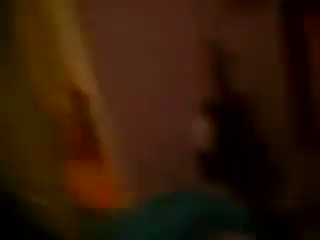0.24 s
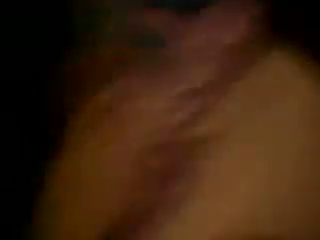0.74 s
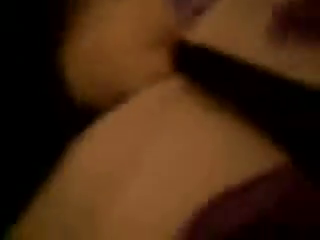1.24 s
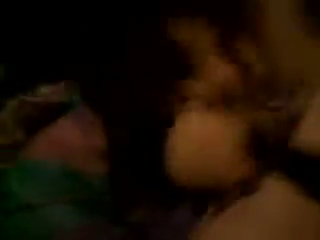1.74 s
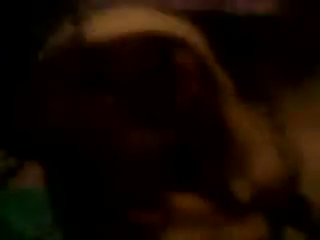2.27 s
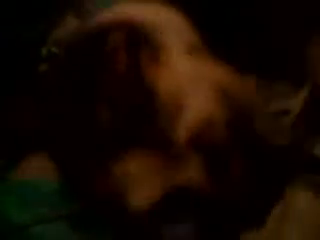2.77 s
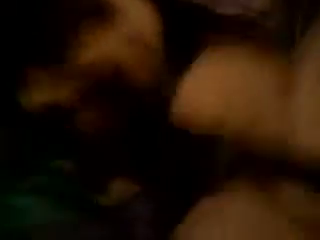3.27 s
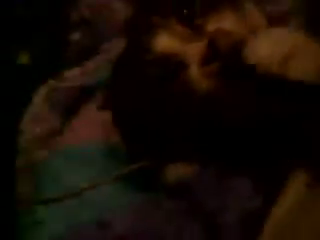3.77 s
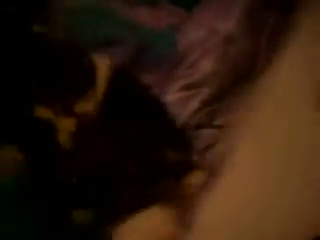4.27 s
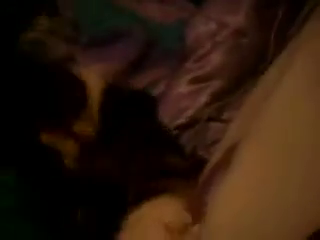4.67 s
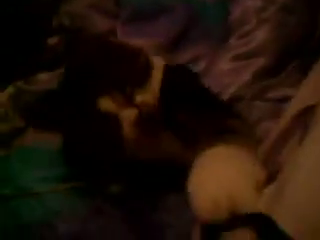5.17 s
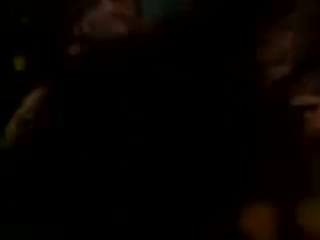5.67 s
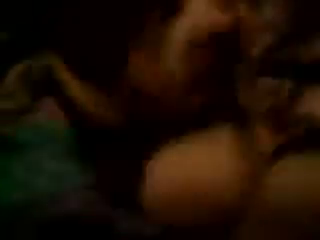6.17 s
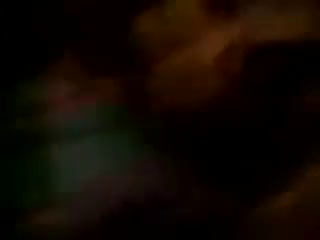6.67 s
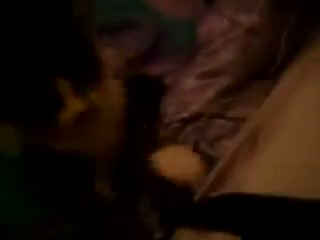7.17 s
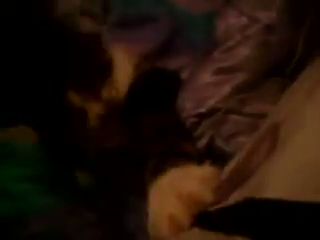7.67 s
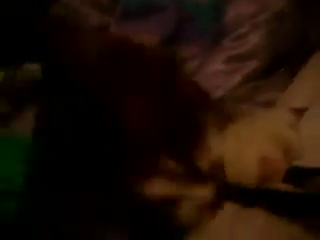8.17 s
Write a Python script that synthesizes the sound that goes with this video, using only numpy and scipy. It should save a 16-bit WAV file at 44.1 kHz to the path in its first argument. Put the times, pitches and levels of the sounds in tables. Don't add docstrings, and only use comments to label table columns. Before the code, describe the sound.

In a quiet indoor space, a cat paws at a hand on bedding right against a small hand-held camera. Quilt folds rustle under a fluttering electrical buzz. Brittle claw clicks, short scrapes and blunt thuds come in uneven bursts, thin out midway, then return as a busy scuffle before the last few strikes. The sound is telephone-like, with low handling rumble and distorted peaks.

```python
import sys
import numpy as np
from scipy import signal
from scipy.fft import rfft, irfft
from scipy.io import wavfile
from scipy.ndimage import uniform_filter1d

SR = 44100
rng = np.random.default_rng(int(sys.argv[2]) if len(sys.argv) > 2 else 0)


def transcribe(signal):
    frames = np.atleast_2d(signal).T
    limited = np.clip(frames, -1, 1)
    pcm = np.round(limited * 32767).astype(np.int16)
    wavfile.write(sys.argv[1], SR, pcm)


def ratio(d):
    e = np.asarray(d, float) / 20
    return 10 ** e


N = 371322

# peak t/s, peak level/dB, ring f/Hz, second ring f/Hz, knock relative level/dB
BLOWS = [(0.989, -1, 2275, 3210.0, -6), (1.8578, -11.5, 2030.0, 3190.0, -10.0),
         (1.917, -13.5, 2790, 3630.0, -8), (2.4177, -4.5, 3596, 2100, -0.5),
         (2.7241, -19, 3170.0, 2590.0, 7.5), (3.4529, -1, 3505, 2260, -1),
         (3.8827, -5.0, 3590.0, 2070.0, -3.0), (3.8894, -3.5, 1880, 3250.0, 0.5),
         (3.8959, -15, 3410.0, 2760.0, -2.0), (5.8604, -18.0, 1910.0, 3170.0, 3.0),
         (5.871, -14, 1870.0, 2470.0, -3), (5.9015, -11, 2400, 2940.0, -17.0),
         (6.102, -13, 2900.0, 3560.0, 7), (6.1311, -13.5, 2120.0, 3140.0, -6.0),
         (6.1422, -1.5, 3570, 1810.0, -4.5), (6.2182, -13, 3120.0, 1820.0, -14),
         (6.2313, -12.5, 3490.0, 2410.0, -4.5), (6.3406, -11, 3120, 3790.0, -14.0),
         (6.3732, -22.5, 2190.0, 3230.0, 5.0), (6.4879, -24, 2150.0, 3180.0, 8.0),
         (6.5689, -11.0, 1840, 3270.0, -2), (6.663, 0.5, 3470, 1680.0, -2), (6.6878, -1, 2067, 3100, 1),
         (6.986, -16, 3105, 1940.0, -10.0), (7.4032, -10.5, 3277, 2730.0, -4.0),
         (7.4089, -14.5, 2777, 1850.0, -9.0), (7.808, -21, 2820.0, 3460.0, 6),
         (7.8162, -3.5, 1960, 3400, -0.5), (7.8335, -5.5, 3340.0, 2050.0, -8),
         (8.2292, -7, 2839, 2100.0, -2)]
# peak t/s, peak level/dB, ring f/Hz, second ring f/Hz,
# second ring relative level/dB
PLUCKS = [(1.0334, -10.5, 2130, 3180, -11), (1.0435, -9.5, 2740, 3610, 1.5), (1.0615, -16, 2130, 3180, 3),
          (1.2344, -17.5, 2990, 3810, -8), (1.5287, -17, 3000, 2000, -18), (1.5531, -18, 1850, 3045, 0.5),
          (1.754, -16.5, 3190, 2380, -12), (1.8601, -14, 3150, 2530, -3.5), (2.7066, -13, 3670, 3010, -2),
          (2.9946, -19.5, 3620, 3040, -5.5), (3.3602, -22, 2200, 3500, -4),
          (3.9076, -22, 2350, 3600, -12.5), (4.3764, -22, 2840, 2300, -2), (6.1708, -15.5, 3180, 2210, -6),
          (6.2018, -10, 3130, 2030, -10), (6.2117, -7.0, 3150, 2610, -14), (6.2274, -15.5, 3110, 2520, -7),
          (6.238, -14, 3210, 2420, -2), (6.2692, -10, 3200, 2210, -8.5), (6.361, -17.5, 3020, 1910, -16),
          (6.4186, -22, 3050, 3770, -6), (6.4517, -22, 3050, 2020, -8.5), (6.5129, -15, 3120, 3750, -5.5),
          (6.6965, -4.0, 3052, 2380, -11), (6.991, -7, 2220, 3530, 0), (7.0902, -5, 3470, 2270, -5.5),
          (7.1003, -8.5, 2360, 3730, -5), (7.1056, -22.5, 2300, 3850, -12), (7.9597, -22, 2870, 3650, -1.5),
          (7.9779, -14.5, 3350, 2020, -7.5)]
# peak t/s, peak level/dB, ring f/Hz
GRAZES = [(0.338, -22, 2190), (0.7893, -22.5, 2720), (0.828, -20.5, 2180), (1.0485, -18.5, 3340),
          (1.3793, -21.5, 2140), (1.7714, -14, 2450), (1.871, -19, 2480), (2.0496, -23, 2554),
          (2.329, -23.5, 3340), (2.4225, -22, 2870), (2.7104, -28.5, 3200), (2.937, -16, 3275),
          (3.465, -19.5, 2460), (3.5916, -15.5, 2510), (3.7698, -21, 3220), (4.826, -20.5, 2150),
          (5.7509, -23.5, 2100), (5.8916, -20, 2010), (6.0634, -19.5, 3060), (6.099, -20, 2950),
          (6.5853, -24, 3490), (6.701, -21, 2300), (7.393, -19, 2210), (7.843, -21.5, 3000),
          (7.845, -20, 3050), (7.935, -30, 2170), (8.3487, -24, 3800), (4.104, -29.5, 2390)]
# peak t/s, peak level/dB, ring f/Hz
SLIPS = [(.859, -36, 2730), (.9025, -30, 2300), (0.9915, -6.5, 3600), (1.0244, -29, 3200),
         (1.0735, -27, 3210), (1.0805, -22, 3430), (1.1005, -26, 3180), (1.1092, -29, 3320),
         (1.115, -27.5, 3400), (1.8568, -14.5, 3220), (1.9736, -27.5, 2300), (2.008, -26, 2550),
         (2.074, -28, 3300), (2.4212, -16, 3570), (2.735, -33, 2790), (2.8546, -18, 2650),
         (3.972, -33.5, 2250), (.9925, -18, 2300), (6.6648, -4.5, 3030), (6.698, -6, 2900),
         (6.6948, -15, 3200), (6.6912, -13, 2900), (6.7, -15, 3000), (7.8355, -10, 3350),
         (6.7275, -30, 2400), (5.288, -33, 2800), (6.295, -28, 2500), (2.9417, -22, 2300),
         (2.979, -27, 2800), (3.038, -30, 3170), (3.886, -15, 2800), (3.8875, -6.5, 3570),
         (5.55, -35, 3310), (5.561, -37, 3300), (5.598, -36, 3200), (5.786, -33, 2320),
         (5.869, -17.5, 2290), (5.894, -29.5, 3200), (6.11, -26, 2940), (6.18, -30, 3120),
         (6.195, -22, 3190), (6.2625, -23, 3250), (6.288, -25, 3200), (6.312, -25.5, 3440),
         (6.4833, -24, 3300), (6.527, -35, 3000), (6.5415, -35, 3300), (6.989, -17, 3000),
         (7.0955, -24, 3300), (7.108, -27, 2300), (7.829, -20, 3000), (7.8527, -25, 2900),
         (7.861, -23, 3200), (7.885, -31, 3300), (7.8935, -35, 2950), (7.9055, -26.5, 3200),
         (8.249, -26, 3000), (8.291, -37, 3300)]
# peak t/s, peak level/dB, ring f/Hz
SNAGS = [(.205, -28, 2170), (0.9272, -29, 2430), (0.9377, -29, 2580), (1.093, -23, 2870),
         (1.188, -25, 3390), (1.2564, -27, 3120), (1.3596, -29.5, 2800), (1.517, -28, 2930),
         (1.954, -23.5, 2900), (2.454, -23.5, 2200), (2.539, -27.5, 3380), (2.987, -23.5, 3400),
         (3.0285, -26.5, 3150), (3.487, -25, 3410), (3.7754, -25, 3160), (4.3858, -24.5, 2290),
         (5.302, -28.5, 2750), (6.4409, -31.5, 2980), (6.5156, -31, 3060), (6.9063, -29, 2270),
         (6.921, -23, 2750), (6.946, -30, 2240), (7.4138, -24, 2850), (7.419, -22.5, 2790),
         (7.4493, -25, 3340), (7.915, -25, 2200), (7.9204, -28, 2500), (8.025, -26.5, 3180),
         (2.922, -30, 3300), (6.012, -32, 3280)]
# t/s, peak level/dB, pitch f/Hz
TAPS = [(1.771, -16, 620), (2.415, -19, 573), (2.722, -24.5, 608), (4.8256, -17.5, 635), (5.752, -26, 680),
        (5.778, -32.5, 260), (6.6636, -13, 1307), (6.6615, -17, 600), (6.672, -28.5, 798),
        (6.6851, -14, 1300), (6.691, -19.5, 1105), (7.807, -19.5, 767), (7.8165, -17, 850),
        (3.8835, -21, 1310), (3.89, -13, 1211), (3.897, -21, 1100), (2.333, -32.5, 550), (.936, -26, 1400),
        (1.0345, -20, 1200), (2.94, -29, 620), (8.2285, -14, 740), (8.25, -23.5, 790), (8.347, -24.5, 610),
        (.829, -23.5, 1100), (1.039, -25.5, 1250), (2.43, -27, 1310), (2.965, -29, 1110),
        (5.551, -33, 1200), (5.599, -37, 900), (5.892, -22, 600), (6.143, -16.5, 1260), (6.302, -28, 1135),
        (6.318, -33, 1100), (6.328, -32, 1135), (6.3468, -19.5, 1150), (6.375, -20.5, 1100),
        (6.434, -30, 950), (6.489, -20, 1150), (6.67, -23, 1200), (7.885, -25.5, 800), (3.457, -20, 1240)]
# peak t/s, peak level/dB, pitch f/Hz, time to fall 60 dB t/s
THUDS = [(0.791, -14.5, 228, 0.0062), (.81, -29, 90, .015), (0.872, -23, 330, 0.0075),
         (.88, -29.5, 162, 0.016), (1.7783, -31.5, 312, 0.0059), (1.8614, -24.5, 121, 0.0177),
         (2.417, -28, 274, 0.028), (2.9977, -37.5, 268, 0.044), (2.94, -37, 270, 0.037),
         (.722, -34, 60, .02), (3.454, -31.5, 345, 0.0049), (3.8834, -21.5, 260, 0.0093),
         (5.6, -35.5, 200, .008), (5.69, -39.5, 90.5, 0.017), (4.4024, -23, 225, 0.0038),
         (4.83, -28, 364, 0.015), (5.854, -27.5, 265, 0.01), (5.8642, -20.5, 130, 0.02),
         (6.1038, -20.5, 233.7, 0.012), (6.115, -32.5, 227, 0.012), (6.131, -32, 274.3, 0.094),
         (6.144, -41.5, 304, 0.038), (6.57, -16, 233, 0.0027), (6.5864, -25, 136.2, 0.016),
         (6.665, -14, 361, 0.006), (6.6881, -23.5, 283, 0.028), (7.3977, -31, 160, 0.0043),
         (7.407, -24.5, 170, 0.004), (7.8166, -13.5, 351.2, 0.013), (7.8272, -27, 185, 0.037),
         (7.8439, -23, 210, 0.0035), (7.855, -26.5, 141, 0.046), (7.921, -23, 226, 0.011),
         (7.927, -23, 120, 0.014), (7.981, -28.5, 274, 0.01), (8.2307, -11.5, 313, 0.0041),
         (8.249, -22, 270, 0.0052)]
# start t/s, end t/s, level/dB, centre f/Hz
DRAGS = [(0.921, 0.95, -35.5, 2360), (1.043, 1.131, -38, 3350), (1.08, 1.101, -37, 1810),
         (2.854, 3.041, -41, 338), (2.899, 3.02, -45.5, 150), (3.897, 3.933, -42.5, 2400),
         (7.834, 7.848, -31, 3300), (6.7, 6.742, -42, 2600), (6.7, 6.719, -40, 900),
         (7.077, 7.105, -33, 2900), (0.974, 1.0, -39, 2810), (1.002, 1.075, -39, 1200),
         (1.003, 1.032, -39, 3100), (1.046, 1.07, -35, 2200), (3.899, 3.957, -44, 3200),
         (6.275, 6.375, -38.5, 2800), (.868, 0.921, -43.5, 2900), (6.142, 6.149, -21.5, 3200),
         (3.455, 3.488, -35.5, 2000), (5.531, 5.619, -65, 1490), (5.538, 5.624, -43.5, 340),
         (5.547, 5.643, -52, 3400), (6.283, 6.369, -38.5, 1130), (6.416, 6.457, -37, 870),
         (6.883, 6.954, -39, 2500), (7.826, 7.917, -36.5, 2900)]
# peak t/s, rustle level/dB, camera jolt level/dB, fade t/s
SHOVES = [(.06, -51, -64, 0.15), (.36, -59.5, -60, 0.16), (.47, -50.5, -59, .04), (.55, -72, -59, 0.063),
          (.72, -56.5, -44.5, 0.15), (0.819, -50.5, -48, 0.078), (.89, -49, -49, 0.24),
          (1.045, -34.5, -50, 0.028), (1.2, -48.5, -71, 0.076), (1.39, -51, -53, 0.071),
          (1.8, -53, -52, 0.26), (1.868, -43, -28, 0.02), (2.06, -49, -50, 0.045),
          (2.33, -49.5, -54.5, 0.049), (2.71, -50.5, -44.5, 0.056), (3.0, -53, -55.5, 0.25),
          (3.459, -41, -53, 0.025), (3.9, -51, -62, 0.066), (4.22, -48, -74, 0.031), (4.41, -55, -40, .04),
          (5.4, -57, -51, 0.028), (5.66, -73, -49, 0.1), (5.862, -42, -31, 0.03), (6.09, -49, -52, 0.13),
          (6.22, -42.5, -44.5, 0.18), (6.59, -45, -42, 0.034), (6.69, -53, -38, 0.015),
          (6.97, -74, -45.5, 0.05), (7.09, -62, -46, 0.045), (7.411, -39, -43.5, 0.046),
          (7.822, -37, -27, 0.036), (7.93, -43, -45.5, 0.12), (8.245, -48, -50, 0.13),
          (8.42, -51, -35, 0.073)]
# f/Hz, width f/Hz, level/dB
RUSTLE = [
    (2040, 690, 2),
    (2900, 920, 1),
    (3400, 1400, -8.5),
]
# f/Hz, level per Hz/dB
FOLDS = [(120, 1), (300, 7.5), (700, 5.5), (1300, 2), (2000, -22)]
# time before read-out t/ms, length t/ms, depth [relative]
WAKE = [(1.8, 0.39, 0.51), (2.2, 0.34, 0.77), (2.5, 0.59, 0.46), (0.82, 0.18, 1.4)]
# f/Hz, level per Hz/dB
HISS = [(15, -38.5), (25, -0.5), (314, -11.5), (508, -9.5), (605, -9), (1020, -30.5), (1190, -12),
        (2010, -12.5), (2240, -23), (3620, -29.5), (4600, -69), (5980, -83), (10100, -120)]

BLOW_T60_S, BLOW_FADE_PER_DB = 0.012, 0.21
PLUCK_T60_S, GRAZE_T60_S, SLIP_T60_S, SNAG_T60_S = 0.013, 0.013, 0.0085, 0.019
PLUCK_KNOCK_DB, GRAZE_KNOCK_DB, SLIP_KNOCK_DB, SNAG_KNOCK_DB = -11.5, -3, -23.5, -32.5
BLOW_SECOND_DB, GRAZE_SECOND_DB, SLIP_SECOND_DB, SNAG_SECOND_DB = -4.5, -5, -7.5, -13
RING_WIDTH_HZ, LAG_S_PER_KHZ, GRIT_DB = 520, .0004, -8
EDGE_HZ, EDGE_DB = 4200, -8
STRAIN_DB, STRAIN_S = -9.5, 0.0049
LOW_MODE_HZ, HIGH_MODE_HZ = 2150, 3350
CASING_HZ, CASING_WIDTH_HZ = 1254, 3300
SHOVE_RISE = 0.43
STILL_RUSTLE_DB, STILL_RUMBLE_DB = -59.5, -56
FOLDS_JOLT_SHARE, FOLDS_DB = 0.71, -4.5
FRAME_HZ, LINE_HZ, LINES_READ, READ_START_S = 20.0319, 511.8, 14, -.0033
DIP_SHARE, BUZZ_DB, COUPLING_HZ = 0.351, -35, 260
HISS_DB = -53
CLIP = .725


def shaped(points, x):
    hz, db = np.transpose(points)
    f = np.maximum(np.arange(N // 2 + 1) * SR / N, 1)
    gain = ratio(np.interp(np.log(f), np.log(hz), db, left=-70, right=-70))
    y = irfft(rfft(x) * gain, N)
    return y / np.std(y)


def walk(rate):
    k = int(SR / rate)
    held = np.repeat(rng.standard_normal(N // k + 1), k)
    return 1.66 * uniform_filter1d(uniform_filter1d(held, k), k)[:N]


def ring(x, hz, width_hz):
    size = x.shape[1]
    f = np.maximum(np.arange(size // 2 + 1) * SR / size, 1)
    y = irfft(rfft(x) / (1 + 1j * (f - hz ** 2 / f) / width_hz), size)
    return y / np.max(np.abs(y), axis=1, keepdims=True)


def burst(t60, rise_s, size):
    t = np.arange(size) / SR
    fall = 1000. ** (-t / np.maximum(t60, 1e-3))
    return rng.standard_normal((len(t60), size)) * (1 - np.exp(-t / rise_s)) * fall


def place(times, sounds):
    size = sounds.shape[1]
    out = np.zeros(N + 2 * size)
    for s, row in zip(times, sounds):
        start = size + int(s * SR) - np.argmax(np.abs(row))
        out[start:start + size] += row
    return out[size:size + N]


def columns(table):
    return (c[:, None] for c in np.transpose(table))


def crackle(size, share):
    strength = ratio(1.2 * rng.exponential(size=size))
    return (rng.random(size) < share) * strength * rng.standard_normal(size)


def contacts():
    rows = []
    for s, db, hz, other_hz, knock_db in BLOWS:
        t60 = BLOW_T60_S * np.exp(BLOW_FADE_PER_DB * db)
        rows.append((s, db, hz, other_hz, BLOW_SECOND_DB, knock_db, t60))
    rows += [(*row, PLUCK_KNOCK_DB, PLUCK_T60_S) for row in PLUCKS]
    light = ((GRAZES, GRAZE_SECOND_DB, GRAZE_KNOCK_DB, GRAZE_T60_S),
             (SLIPS, SLIP_SECOND_DB, SLIP_KNOCK_DB, SLIP_T60_S),
             (SNAGS, SNAG_SECOND_DB, SNAG_KNOCK_DB, SNAG_T60_S))
    for table, second_db, knock_db, t60 in light:
        for s, db, hz in table:
            far_hz = LOW_MODE_HZ if hz > (LOW_MODE_HZ + HIGH_MODE_HZ) / 2 else HIGH_MODE_HZ
            rows.append((s, db, hz, far_hz, second_db, knock_db, t60))
    return rows


def claws():
    s, db, hz, other_hz, other_db, knock_db, t60 = columns(contacts())
    size = 4096
    t = np.arange(size) / SR
    width_hz = RING_WIDTH_HZ * np.clip((0.01 / t60) ** 0.5, .5, 2)

    def click(f):
        return np.exp(-((t - .002 - LAG_S_PER_KHZ * (3600 - f) / 1000) / 6e-5) ** 2)

    def mode(f):
        return ring(ring(click(f), f, width_hz), f, 1.6 * width_hz)

    middle_hz = (hz + other_hz) / 2
    grit = ring(ring(burst(t60, 0.0013, size), middle_hz, 1800.0), middle_hz, 3000.0)
    tick = mode(hz) - ratio(other_db) * mode(other_hz) + ratio(GRIT_DB) * np.roll(grit, 70, axis=1)
    rattle = ring(burst(2.5 * t60, 0.0012, size), CASING_HZ, CASING_WIDTH_HZ)
    knock = ring(click(CASING_HZ + 0 * hz), CASING_HZ, 470.0) + 0.8 * np.roll(rattle, 70, axis=1)
    scatter = ring(burst(0.11 + 0 * t60, 0.0006, size), 3300.0, 1700.0)
    strain = ring(burst(STRAIN_S + 0 * t60, 0.0004, size), hz, 1800.0)[:, ::-1]
    strain = np.roll(strain, 88, axis=1)
    strain_db = STRAIN_DB - 0.8 * np.maximum(knock_db + 13, 0)
    edge = ring(click(3600 + 0 * hz), EDGE_HZ, 1100.0)
    strike = tick + ratio(strain_db) * strain + ratio(EDGE_DB) * edge
    strike = strike + ratio(knock_db - 3.0) * knock + ratio(-20.5) * scatter
    strike = np.roll(strike, 600, axis=1)
    peak = np.max(np.abs(narrow(strike)), axis=1, keepdims=True)
    return place(s[:, 0], ratio(db) * strike / peak)


def taps():
    s, db, hz = columns(TAPS)
    click = np.exp(-((np.arange(4096) / SR - .0015) / 1e-4) ** 2) + 0 * hz
    clean = ring(ring(click, hz, .45 * hz), hz, 870.0)
    rough = ring(ring(burst(0.014 + 0 * hz, 0.0019, size=4096), hz, 0.29 * hz), hz, 870.0)
    return place(s[:, 0] + 0.0013, ratio(db - 1.0) * (clean + 0.6 * rough))


def paws():
    s, db, hz, t60 = columns(THUDS)
    t = np.arange(8192) / SR
    push = -np.sin(np.pi * np.clip(t * hz * 2.5, 0, 1))
    body = ring(push, hz, 1.4 / np.maximum(t60, .005))
    wobble = ring(ring(burst(8.4 * t60, 0.0038, size=8192), hz, 2.8 * hz), hz, 1.4 * hz)
    return place(s[:, 0], ratio(db) * (body + 0.5 * wobble))


def drags():
    size = 16384
    t = np.arange(size) / SR
    out = np.zeros(N + size)
    for start, end, db, hz in DRAGS:
        contact = np.clip(np.minimum(t, end - start - t) / 0.0076, 0, 1)
        row = ring((contact * crackle(size, .12))[None], hz, min(1.4 * hz, 1400.))[0]
        rms = np.sqrt(np.sum(row ** 2) / ((end - start) * SR))
        first = int(start * SR)
        out[first:first + size] += ratio(db) * row / rms
    return out[:N]


def motion():
    s, rustle_db, jolt_db, fade = columns(SHOVES)
    t = np.arange(0, N, 64) / SR - s
    swell = np.exp(-np.abs(t) / (fade * np.where(t < 0, SHOVE_RISE, 1)))

    def total(db, still_db):
        power = ratio(still_db) ** 2 + np.sum((ratio(db) * swell) ** 2, axis=0)
        return np.repeat(10 * np.log10(power), 64)[:N]

    rustle = total(rustle_db, STILL_RUSTLE_DB)
    rumble = total(jolt_db, STILL_RUMBLE_DB)
    return rustle, FOLDS_DB + FOLDS_JOLT_SHARE * (rumble - rustle), rumble


def bedding():
    rustle_db, body_db, rumble_db = motion()
    grains = crackle(N, .15)[None]
    rustle = np.zeros(N)
    for hz, width_hz, db in RUSTLE:
        fibres = ring(ring(grains, hz, width_hz), hz, 2 * width_hz)[0]
        rustle += ratio(db + 2.9 * walk(70)) * fibres
    rustle = rustle / np.std(rustle)
    folds = ratio(body_db + 1.6 * walk(40)) * shaped(FOLDS, rng.standard_normal(N))
    rumble_colour = [(12, -4.0), (40, -5.5), (110, -7.0), (220, -14.5)]
    rumble = ratio(3.1 * walk(12) + 1.2 * walk(4)) * shaped(rumble_colour, rng.standard_normal(N))
    return ratio(rustle_db + 6.0) * (rustle + folds) + ratio(rumble_db - 1.5) * rumble


def dip(t, length, edge=6e-5):
    return np.clip(np.minimum(t, length - t) / edge + .5, 0, 1)


def sensor():
    lead = .01
    frames = (np.arange(N) / SR - READ_START_S + lead) * FRAME_HZ
    t = frames % 1 / FRAME_HZ - lead
    early = lead / 100
    reading = (t > -early) & (t < LINES_READ / LINE_HZ - early)
    line = (t + early) % (1 / LINE_HZ) - early
    supply = reading * (DIP_SHARE - dip(line, DIP_SHARE / LINE_HZ))
    slip = 4e-5 * rng.standard_normal(int(frames[-1]) + 1)[frames.astype(int)]
    wake_s = WAKE[1][0] / 1000
    supply = supply + 0.62 * dip(t + wake_s, wake_s)
    for ms, length_ms, depth in WAKE:
        supply = supply - depth * dip(t + slip + ms / 1000, length_ms / 1000)
    capacitor = signal.butter(1, COUPLING_HZ, "high", fs=SR, output="sos")
    return ratio(BUZZ_DB + .5 * walk(3.2)) * signal.sosfilt(capacitor, supply)


def hiss():
    return ratio(HISS_DB + 0.45 * walk(19)) * shaped(HISS, rng.standard_normal(N))


def narrow(x):
    edge_hz = [0, 3650, 4000, 4380, 4560, 4800, 7000, SR / 2]
    edge_db = [1.0, -0.5, -6.0, -18.0, -47, -48.0, -79.5, -130]
    taps = signal.firwin2(769, edge_hz, ratio(edge_db), fs=SR, window=("kaiser", 10.5))
    return signal.fftconvolve(x, taps[None], mode="same", axes=1)


def scene():
    return (claws() + taps() + paws() + drags() + bedding() + sensor() + hiss())[None]


def low_pass(x):
    return signal.sosfilt(signal.butter(12, 16560, fs=SR, output="sos"), x)


def record(dry):
    mix = np.clip(narrow(dry), -CLIP, CLIP)
    return low_pass(mix)


dry = scene()
out = record(dry)
transcribe(out)
```